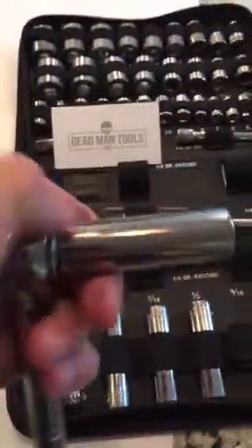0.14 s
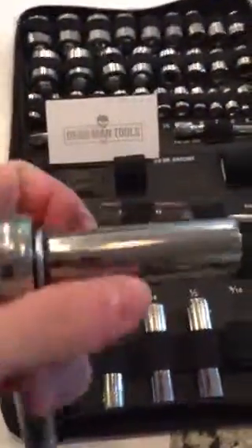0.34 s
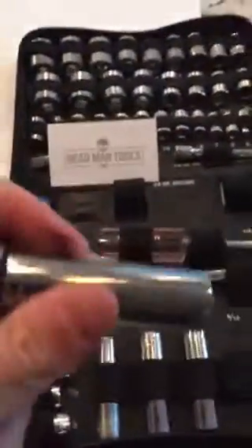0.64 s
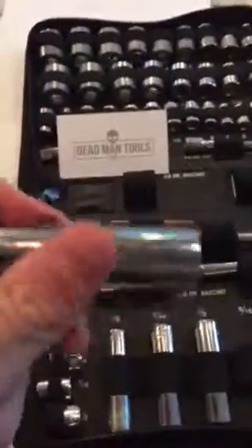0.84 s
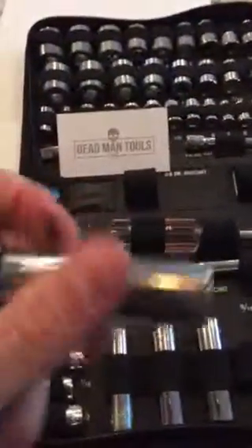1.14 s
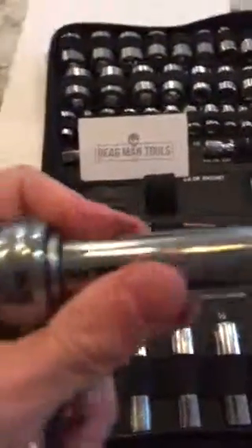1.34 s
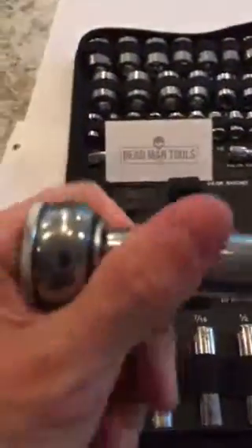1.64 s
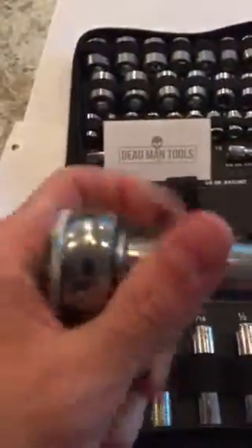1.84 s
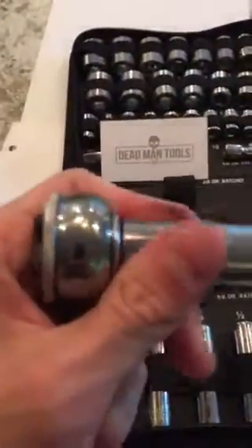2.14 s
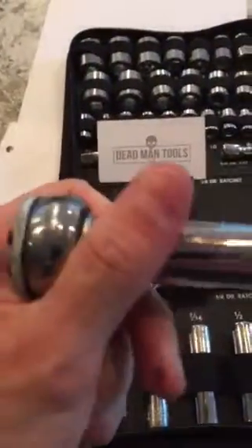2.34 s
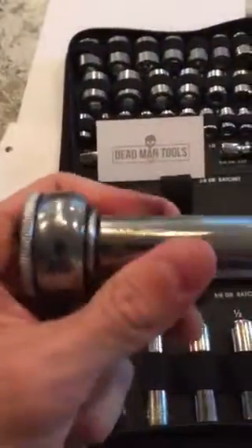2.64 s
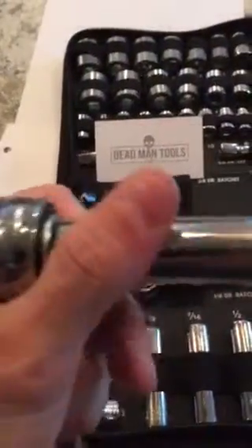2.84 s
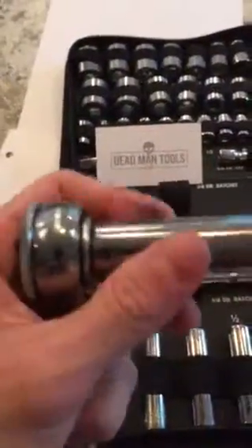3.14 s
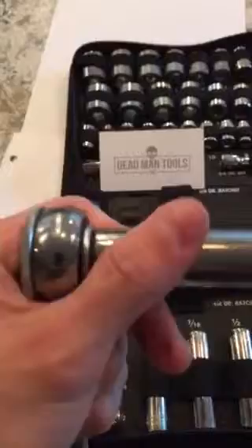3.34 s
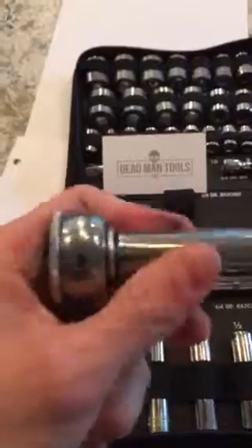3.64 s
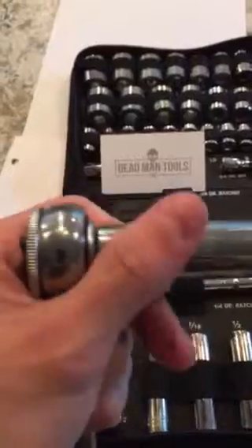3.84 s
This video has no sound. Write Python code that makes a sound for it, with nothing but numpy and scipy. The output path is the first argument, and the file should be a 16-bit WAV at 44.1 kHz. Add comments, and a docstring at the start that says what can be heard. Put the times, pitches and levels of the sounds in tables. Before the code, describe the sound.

Near silence with a barely audible finger brush, then a few ratchet clicks, followed by five faster metallic clicking bursts from a hand-turned wrench, with tiny loose-part ticks, recorded closely in a small room.

```python
"""A low room rumble is heard first, then a faint brush of a finger on steel; then a steel ratchet wrench
with a deep socket is twisted by hand in six short strokes, close to the microphone. At each tooth the pawl
scrapes up, snaps down and rattles (coloured noise bursts), knocks the head and rings the steel (decaying
modes) over a low thud; the shifting grip damps the rings. Loose parts tick now and then, as resonant taps.
A small quiet room answers with early reflections and a diffuse tail of decaying noise."""
import sys
import numpy as np
from scipy import signal
from scipy.fft import rfft, irfft, next_fast_len
from scipy.io import wavfile
from scipy.ndimage import uniform_filter1d, minimum_filter1d

SR = 44100
rng = np.random.default_rng(int(sys.argv[2]) if len(sys.argv) > 2 else 0)


def log_audio(samples):
    """Write samples as a 16-bit WAV file to the path given in sys.argv[1]."""
    # one column per channel
    frames = np.atleast_2d(samples).T
    # limit to full scale, then quantise
    limited = np.clip(frames, -1, 1)
    pcm = np.round(limited * 32767).astype(np.int16)
    wavfile.write(sys.argv[1], SR, pcm)


N = 176400  # length of the scene [samples]

# Background spectrum of the room: (frequency [Hz], level [dB])
RUMBLE_COLOUR = [(20, -38), (43, -1.5), (175, -0.5), (344, -15.5), (4740, -33), (16000, -37)]
# Ticks of loose parts: (time [s], level [dB])
TICKS = [(1.0187, -36), (1.076, -53.5), (1.2115, -45), (1.9524, -40), (2.5631, -49.5), (3.0772, -45),
         (3.334, -35), (3.398, -32), (3.518, -45), (3.5917, -46.5), (3.7648, -50.5), (3.826, -25)]
# Spectrum of a tick, and of the scrape up a tooth: (frequency [Hz], level [dB per Hz])
TICK_COLOUR = [(300, -2.5), (900, -14), (1400, 0), (2300, 2.5), (4000, -2.5), (6000, -2), (10000, -5),
               (16000, -21.5)]
# Spectrum of the pawl's snap, and of the finger's brush: (frequency [Hz], level [dB per Hz])
SNAP_COLOUR = [(600, -40.5), (1400, -19), (3000, -8.5), (4800, -11), (6300, 0), (8500, -1), (10500, -10.5),
               (11500, -1), (12300, -7.5), (14000, 1.5), (16500, -9)]
# Modes of the steel by family, t60 at stretch 1: (frequency [Hz], level [dB], t60 [s])
MODES = { "low": [(3945, -2.5, 0.058), (4200, -9, 0.04)], "middle": [(5615, -14.5, 0.045)],
         "main": [(7100, -1.5, 0.055), (7000, -10, 0.028), (7380, -13.5, 0.031)],
         "high": [(11290, -9, 0.02), (11420, -8, 0.024)], "top": [(14720, -11, 0.022), (15520, -6, .016)], }
# Spectrum of the room's answer: (frequency [Hz], level [dB])
ROOM_COLOUR = [(100, -10), (1000, -0.5), (2250, -0.5), (2900, -6.5), (4000, -1.5), (4800, -4.5), (7100, -3),
               (8400, -4), (9700, 0.5), (10600, -2), (11400, -1.5), (13000, -5.5), (15600, -4)]
# Strokes of the hand: (start time [s], length of the chatter [factor],
# middle ring relative to the low ring [dB], thud [dB])
STROKES = [(.85, 0.61, -13.5, 0.5), (1.5, 1.02, 0, -1), (2.2, 0.81, 1, -0.5), (2.8, 1.44, 9, -2.5),
           (3.3, 2.1, 2.5, -0.5), (3.8, 1.86, 2.5, -1)]
# Teeth passed by the pawl; the last four columns are relative to the strength: (time [s], strength [dB],
# knock of the head [dB], low ring [dB], main ring [dB], top ping [dB])
TEETH = [(0.8909, -22.5, -16, -12.5, -33.5, -4.5), (0.9215, -20.5, -21.5, -15, -27, -2),
         (0.9677, -24, -15, -9.5, -25, 4.5), (1.023, -23, -16.5, -5.5, -12, 3.5),
         (1.572, -23, -12, -7, -16, -6.5), (1.6295, -21, -13.5, -8.5, 0.5, 1),
         (1.6774, -25, -6, -10.5, 9.5, 6.5), (1.6977, -21.5, -7.5, -5.5, 7.5, 2.5),
         (1.7165, -25, -4.5, -3, 7.5, 1.5), (1.7346, -25, -6.5, -8.5, 4, 4),
         (1.7496, -32, -2, 0.5, -9, 6.5), (1.764, -25.5, -8.5, -11, -4, 5.5),
         (1.7906, -25, -11.5, -11, -9, 0.5), (2.2331, -21, -14, -12, -12, -8.5),
         (2.2683, -19.5, -19, -17.5, -23, -5.5), (2.306, -21, -4, -18, -1.5, 2),
         (2.3264, -21, -12.5, -9.5, 1.5, 1.5), (2.3403, -23, -8, -15, -7, 1),
         (2.3543, -22.5, -11, -10, -24.5, -2.5), (2.366, -26.5, -6, -11.5, -27, 5.5),
         (2.3778, -25.5, -9, -6, -28.5, 1), (2.3962, -26, -7, -14.5, -33, -17.5),
         (2.4375, -27.5, -7.5, -16.5, -29.5, -33.5), (2.825, -23.5, -5.5, -9.5, -0.5, -2.5),
         (2.8376, -24.5, -2, -11.5, -3, -7), (2.8551, -24, -5, -17, -2.5, -6.5),
         (2.8655, -23, -1.5, -10.5, 1, -6.5), (2.875, -24.5, -4.5, -5.5, 1.5, -7.5),
         (2.8891, -22, -10, -10.5, 1.5, -4.5), (2.9036, -25, -6, -14, 5, -21.5),
         (2.915, -26, -7.5, -20, -1.5, 0), (2.9235, -19.5, -12, -20, -6.5, -6.5),
         (2.9322, -25.5, -7.5, -7.5, -3.5, -2.5), (2.9427, -26.5, -6.5, -13, -2.5, -1),
         (2.958, -23.5, -13, -10, -1, -9), (3.337, -23.5, -7, -6.5, -9, -2.5),
         (3.3464, -24, -5.5, -18.5, -5.5, -5), (3.3578, -31.5, -8.5, 6.5, -4, 8),
         (3.3858, -28, -3, -11, -14, 4), (3.4019, -29.5, -8, 2, -4, 7.5),
         (3.4391, -28.5, -9, -14, -10.5, -2.5), (3.469, -27.5, -10, -13.5, -12, 3.5),
         (3.495, -25.5, -11.5, -16.5, -14, 2.5), (3.813, -22.5, -7.5, -14, -4, -5.5),
         (3.8214, -22, -8, -11, 3, -3.5), (3.831, -24, -6, 0.5, 1, -4), (3.8466, -23, -7.5, -2.5, -0.5, -8),
         (3.8621, -28.5, 0.5, 5, 3, -5), (3.8801, -27.5, -3.5, 1.5, 1, 3), (3.92, -27, -7, -1.5, 2.5, -6),
         (3.948, -26, -10, -4.5, 2, -0.5)]
# The shifting grip: (time [s], head resonance [Hz], its level [dB],
# lean from the high ring towards the pawl resonance [dB])
GRIP = [(0.891, 2147, -7, 3.5), (1.57, 2400, -5, -3), (1.681, 2387, -6.5, 3), (1.79, 1796, -5, -6.5),
        (2.23, 2500, -7.5, 0), (2.35, 2294, -10, 6), (2.439, 2234, 4, -1), (2.825, 1873, -7, 2.5),
        (2.90, 2334, 2, -3), (2.96, 1840, 0.5, 0.5), (3.339, 2320, -9, 0.5), (3.81, 1500, -16, 5.5),
        (3.86, 1390, -14, 6), (3.95, 2070, -6, -6.5)]
# Spectrum of the knock of the head: (frequency [Hz], level [dB per Hz])
KNOCK_COLOUR = [(850, -31), (1400, -7), (2300, 2), (2900, -5.5), (3500, 2), (5000, -12.5), (9000, -44)]
# Spectrum of the noisy part of the top ping: (frequency [Hz], level [dB per Hz])
PING_COLOUR = [(12500, -32), (14200, -14), (14750, 5.5), (15100, -12), (15550, -3), (16500, -22)]
# Spectrum of the low thud under each click: (frequency [Hz], level [dB])
THUD_COLOUR = [(30, -21.5), (70, 2), (200, -1), (650, -14), (1300, -26.5), (5000, -70)]

STRIKE_S, RING_S = .01, .3  # span that sets the level of a strike, time allotted to one sound
RUMBLE_DB = -62
RUMBLE_SWELL_DB, RUMBLE_SWELL_HZ, RUMBLE_SPLIT_HZ = 1.5, 14, 300  # random swell of the bass below the split

# t60 values of contacts shape the chatter before it is evened out
BRUSH_START_S, BRUSH_DB, BRUSH_T60_S = 0.43, -65.5, .06
TICK_T60_S, TICK_RING_DB = 0.048, -11.5
TICK_LOWEST_HZ, TICK_HIGHEST_HZ = 2190, 5514  # range of the resonance of a loose part

RING_ATTACK_S = 0.00033  # the chatter takes a moment to build up a ring
DETUNE, MODE_SCATTER_DB, DECAY_SCATTER = .0025, 2.2, .2  # spread of pitch [share], level, log decay time
AFTER_RING_DB, AFTER_RING_LENGTH = -42, 2  # a faint part lingers for this multiple of the listed t60
GRIP_DAMPING = 0.27  # a ring that the hand holds down is also shorter: dB of length per dB of level
FREE_RING_DB = 6  # relative level at which a low or main ring has stretch 1

ROOM_DB, ROOM_T60_S, ROOM_TOP_T60_S, ROOM_DELAY_S = -18.5, 0.53, .36, 0.0076
EARLY_DB, EARLY_T60_S = -17.5, 0.068

# t60 of snap, rattle, knock and ping at a stroke length factor of 1
SNAP_DB, SNAP_T60_S = -2.5, 0.011
RATTLE_DB, RATTLE_T60_S = -8.5, 0.016  # the pawl settles after each snap
KNOCK_DB, KNOCK_T60_S, KNOCK_ATTACK_S = -3, 0.027, 0.00089
PING_DB, PING_T60_S = -2.5, 0.0014
PAWL_HZ, PAWL_DB, RESONANCE_WIDTH_HZ = 9663, -5.5, 320
HEAD_T60_S, HEAD_UPPER_RATIO, HEAD_UPPER_DB = 0.013, 1.54, -14.5
PAWL_SHIFT, HEAD_SHIFT = .014, .056  # spread of the broad resonances from tooth to tooth [share]
THUD_DB = -20  # low thud under each click, stronger with a loud top ping
CLIMB_DB, CLIMB_S = -22, 0.0055  # level and growth time constant of the scrape up a tooth

TOP_HZ, CEILING_DB, LIMITER_S = 16300, -2.6, .002


def amp(db):
    """Level law: 20 dB is a factor of ten in amplitude."""
    return 10 ** (np.asarray(db) / 20)


def unit(x):
    """Energy normalization: the squares sum to one."""
    return x / np.sqrt(np.sum(x ** 2))


def fade(t, t60):
    """Exponential decay: 60 dB in t60 seconds."""
    return np.exp(-np.log(1000) * t / t60)


def colour(x, points):
    """Minimum-phase filtering: the folded cepstrum makes a causal filter through (Hz, dB) points."""
    hz, db = np.array(points, float).T
    n = next_fast_len(len(x)) * 2
    f = np.maximum(np.arange(n // 2 + 1) * SR / n, 1)
    log_gain = np.log(amp(np.interp(np.log(f), np.log(hz), db)))
    cepstrum = irfft(log_gain, n)
    cepstrum[1:n // 2] *= 2
    cepstrum[n // 2 + 1:] = 0
    response = np.exp(rfft(cepstrum))
    return irfft(rfft(x, n) * response, n)[:len(x)]


def add(out, s, x):
    """Superposition: a sound starts at time s; unit energy becomes unit rms over STRIKE_S."""
    i = int(s * SR)
    out[i:i + len(x)] += x[:len(out) - i] * np.sqrt(STRIKE_S * SR)


def rumble():
    """Broadband background noise: shaped Gaussian noise whose bass wavers by slow amplitude modulation."""
    noise = colour(rng.standard_normal(N), RUMBLE_COLOUR)
    background = amp(RUMBLE_DB) * np.sqrt(N) * unit(noise)
    split = signal.butter(2, RUMBLE_SPLIT_HZ, fs=SR, output="sos")
    bass = signal.sosfiltfilt(split, background)
    steps = rng.standard_normal(N // 100)
    swell = np.interp(np.arange(N) / SR * RUMBLE_SWELL_HZ, np.arange(len(steps)), steps)
    return background + bass * (amp(RUMBLE_SWELL_DB * swell) - 1)


def contact(envelope, points):
    """Contact noise: many tiny impacts make a brief burst, evened out across frequency, then coloured."""
    burst = rfft(rng.standard_normal(len(envelope)) * envelope)
    even = irfft(burst / np.abs(burst), len(envelope))
    return unit(colour(even * envelope ** (1 / 4), points))


def resonate(x, hz, width_hz):
    """Forced resonance: a damped oscillator picks out one broad band, at unit energy."""
    return unit(signal.lfilter(*signal.iirpeak(hz, hz / width_hz, fs=SR), x))


def ring(t, family, stretch=1):
    """Modal superposition: a family of decaying sines, struck and damped a little differently every time."""
    out = 0
    for hz, db, t60 in MODES[family]:
        detune, size, hold = rng.standard_normal(3)
        main_decay = fade(t, t60 * stretch * np.exp(DECAY_SCATTER * hold))
        after_ring = amp(AFTER_RING_DB) * fade(t, t60 * AFTER_RING_LENGTH)
        attack = 1 - np.exp(-t / RING_ATTACK_S)
        tone = np.sin(2 * np.pi * (hz * (1 + DETUNE * detune) * t + rng.random()))
        wave = tone * attack * (main_decay + after_ring)
        strike_energy = np.sum(wave[t < STRIKE_S] ** 2)
        out = out + amp(db + MODE_SCATTER_DB * size) * wave / np.sqrt(strike_energy)
    return out


def handling():
    """Friction and light impact: a finger brushes the steel; loose parts tick, each with its own resonance."""
    out, t = np.zeros(N), np.arange(int(RING_S * SR)) / SR
    for s, db in TICKS:
        tap = contact(fade(t, TICK_T60_S), TICK_COLOUR)
        steel = ring(t, "low") + ring(t, "main") / 2 + 2 * ring(t, "middle")
        part_hz = rng.uniform(TICK_LOWEST_HZ, TICK_HIGHEST_HZ)
        tick = (tap + resonate(tap, part_hz, RESONANCE_WIDTH_HZ)) / 2
        add(out, s, amp(db) * (tick + amp(TICK_RING_DB) * steel))
    brush = contact(t * fade(t, BRUSH_T60_S), SNAP_COLOUR)
    add(out, BRUSH_START_S, amp(BRUSH_DB) * brush)
    return out


def room(x):
    """Reverberation: early reflections and a diffuse tail whose treble dies sooner."""
    t = np.arange(SR) / SR
    noise = rng.standard_normal(SR)
    low = signal.sosfiltfilt(signal.butter(2, 9000, fs=SR, output="sos"), noise)
    tail = unit(low * fade(t, ROOM_T60_S) + (noise - low) * fade(t, ROOM_TOP_T60_S))
    # cubing makes a few reflections stand out
    early = unit(rng.standard_normal(SR) ** 3 * fade(t, EARLY_T60_S))
    answer = colour(amp(ROOM_DB) * tail + amp(EARLY_DB) * early, ROOM_COLOUR)
    delayed = np.pad(answer, (int(ROOM_DELAY_S * SR), 0))
    return signal.fftconvolve(x, delayed)[:N]


def hollow(t, hz):
    """Damped resonance: the short two-note 'tock' of the head in the cupped hand."""
    lower = np.sin(2 * np.pi * hz * t)
    upper = amp(HEAD_UPPER_DB) * np.sin(2 * np.pi * hz * HEAD_UPPER_RATIO * t)
    attack = 1 - np.exp(-t / KNOCK_ATTACK_S)
    return unit((lower + upper) * attack * fade(t, HEAD_T60_S))


def ratchet():
    """Repeated impact: the pawl climbs each tooth and drops with snap, knock and steel rings over a low thud."""
    out, t = np.zeros(N), np.arange(int(RING_S * SR)) / SR
    thud = unit(colour(signal.unit_impulse(len(t)), THUD_COLOUR))
    grip_s, *grip = np.array(GRIP).T
    for s, db, knock_db, low_db, main_db, top_db in TEETH:
        # the latest stroke to have started, and the grip at this moment
        _, length, middle_db, thud_db = [row for row in STROKES if row[0] <= s][-1]
        head_hz, head_db, lean_db = (np.interp(s, grip_s, column) for column in grip)
        pawl_hz = PAWL_HZ * (1 + PAWL_SHIFT * rng.standard_normal())
        head_hz = head_hz * (1 + HEAD_SHIFT * rng.standard_normal())

        # the scrape grows until the pawl drops
        climb = contact(np.exp((t - RING_S) / CLIMB_S), TICK_COLOUR)
        add(out, s - RING_S, amp(db + knock_db / 2 + CLIMB_DB) * climb)

        rattle = amp(RATTLE_DB) * fade(t, RATTLE_T60_S * length)
        chatter = fade(t, SNAP_T60_S * length) + rattle
        snap = amp(SNAP_DB) * contact(chatter, SNAP_COLOUR)
        pawl = resonate(contact(chatter, SNAP_COLOUR), pawl_hz, RESONANCE_WIDTH_HZ)
        snap = snap + amp(PAWL_DB + lean_db) * pawl

        blow = (1 - np.exp(-t / KNOCK_ATTACK_S)) * fade(t, KNOCK_T60_S * length)
        knock = amp(KNOCK_DB) * contact(blow, KNOCK_COLOUR) + amp(head_db) * hollow(t, head_hz)

        ping_noise = contact(fade(t, PING_T60_S * length), PING_COLOUR)
        ping = amp(PING_DB) * ping_noise + ring(t, "top", length)

        steel = amp(low_db + middle_db) * ring(t, "middle") + amp(-lean_db) * ring(t, "high", length)
        for family, ring_db in (("low", low_db), ("main", main_db)):
            stretch = amp(GRIP_DAMPING * (ring_db - FREE_RING_DB))
            steel = steel + amp(ring_db) * ring(t, family, stretch)

        low_thud = amp(THUD_DB + thud_db + top_db) * thud
        tooth = snap + steel + amp(knock_db) * knock + amp(top_db) * ping + low_thud
        add(out, s, amp(db) * tooth)
    return out


def scene():
    """Linear superposition: direct sound of wrench and handling, the room's answer, and background."""
    wrench = ratchet() + handling()
    return (wrench + room(wrench) + rumble())[None]


def record(dry):
    """Band limiting and peak limiting: deepest bass and top are cut, the sharpest peaks held down."""
    top = signal.ellip(8, .2, 70, TOP_HZ, fs=SR, output="sos")
    bass_cut = signal.butter(2, 40, "high", fs=SR, output="sos")
    x = signal.sosfilt(bass_cut, signal.sosfilt(top, dry))
    size = int(LIMITER_S * SR) | 1  # an odd window is centred on its sample
    needed = 1 / np.maximum(np.abs(x) / amp(CEILING_DB), 1)
    gain = uniform_filter1d(minimum_filter1d(needed, size), size)
    return signal.sosfiltfilt(top, x * gain)


dry = scene()
out = record(dry)
log_audio(out)
```